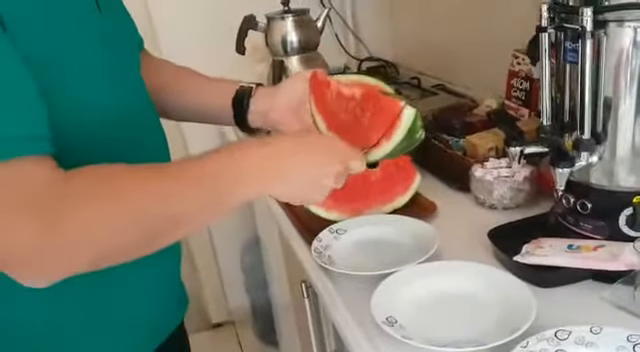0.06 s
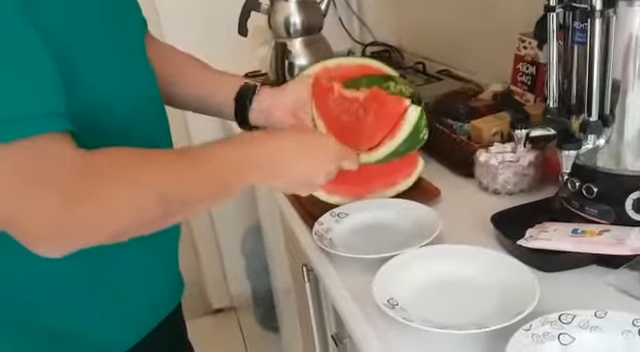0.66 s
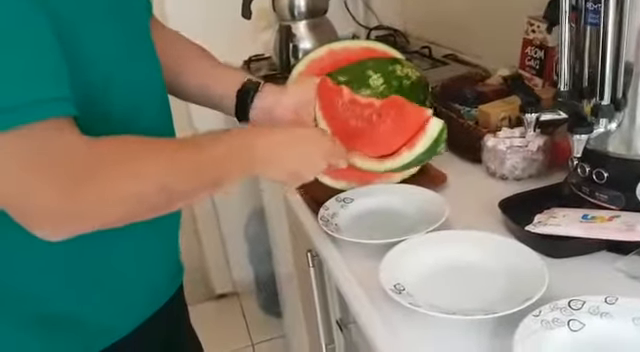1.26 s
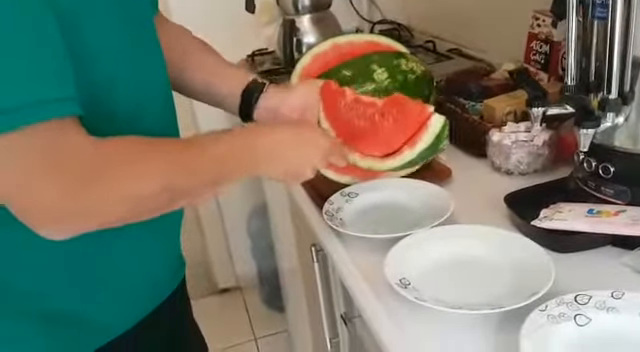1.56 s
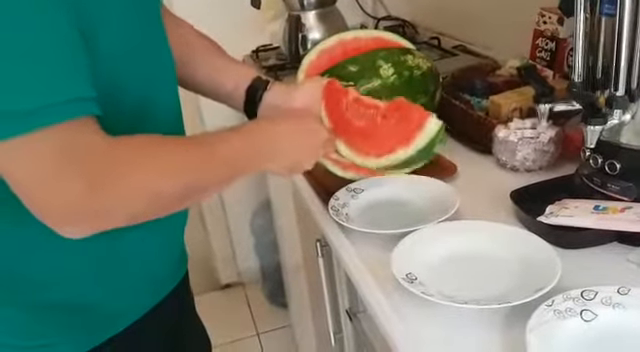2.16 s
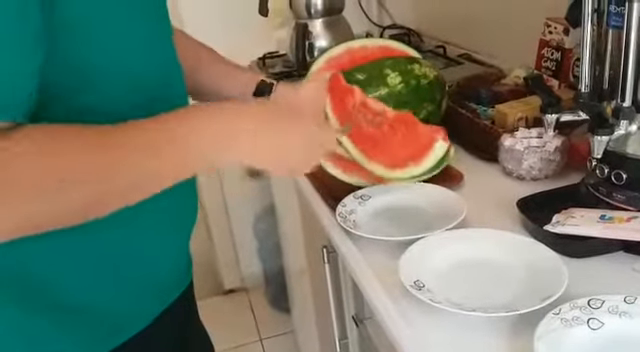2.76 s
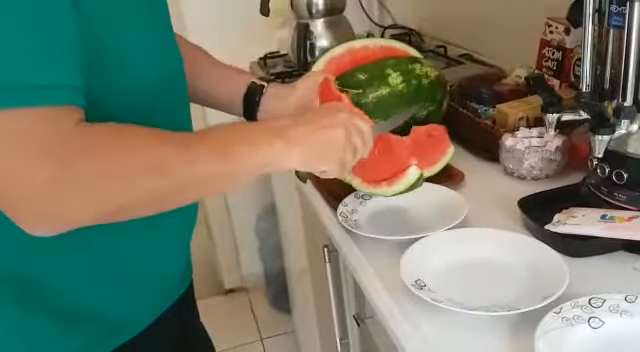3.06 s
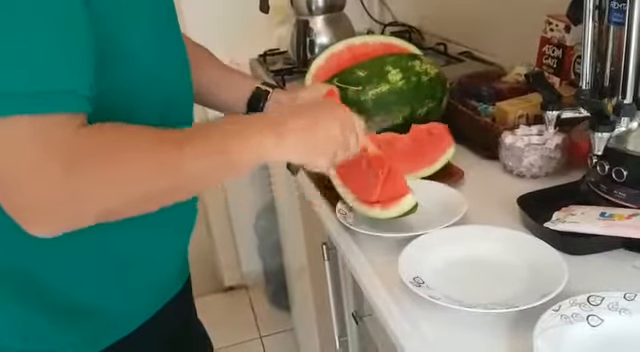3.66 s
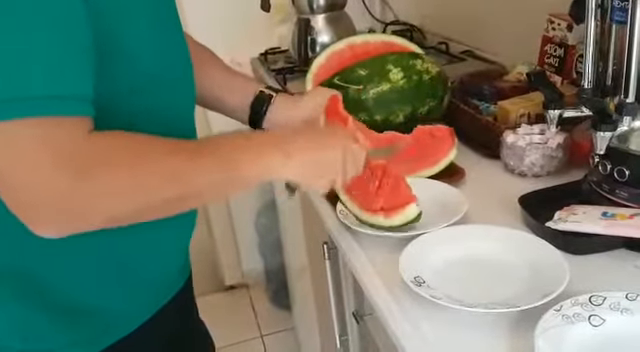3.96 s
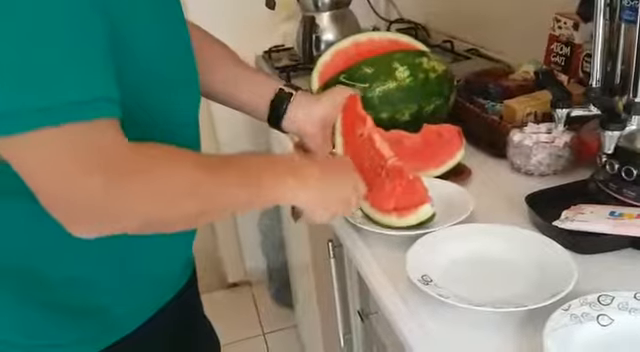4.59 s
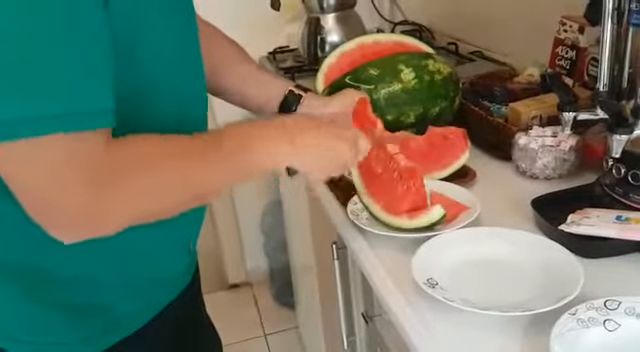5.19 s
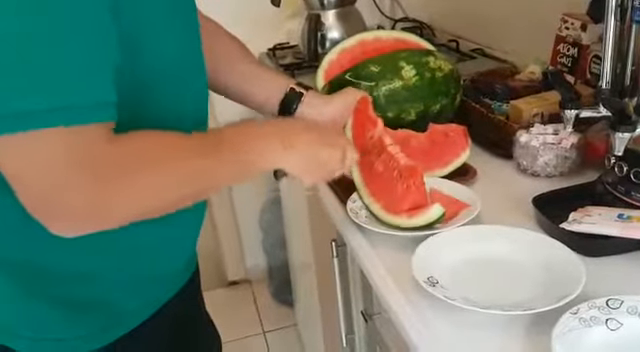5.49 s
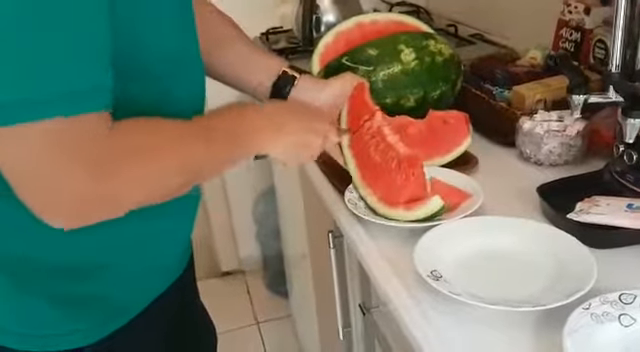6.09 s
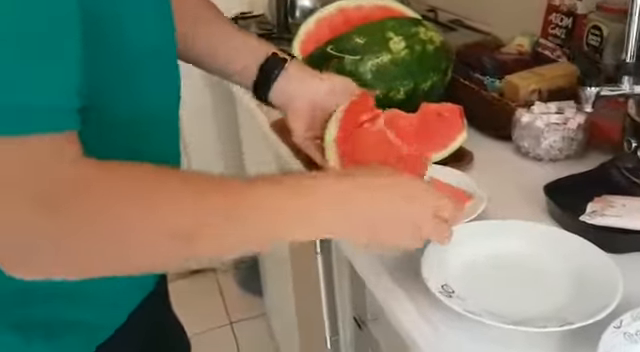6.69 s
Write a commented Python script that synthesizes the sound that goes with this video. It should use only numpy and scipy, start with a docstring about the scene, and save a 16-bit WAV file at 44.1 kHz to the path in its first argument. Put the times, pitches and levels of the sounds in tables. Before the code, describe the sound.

For the first second or so, a knife saws back and forth through a watermelon slice in soft, even, wet strokes. Separate juicy crunches follow until about 3.8 seconds, with tiny snaps of fibre and faint creaks of rind. Around 4 seconds a china plate clatters loudly on the counter as the steel blade clinks against it several times. Wet cuts continue until about 6 seconds, mixed with lighter plate knocks, dull bumps of the fruit, a short creak at 5 seconds and bright taps on the china near 5.5, 5.7 and 6.3 seconds. From 6.7 to 6.9 seconds the plate clatters sharply again, with ringing clinks and low thumps. Everything is heard from about a metre away in a small, hard-walled kitchen, over faint room air, an appliance hum and a low rumble.

```python
"""A small, hard-walled kitchen, about a metre from a knife sawing through a watermelon slice.
Short wet strokes come first, each a crowd of bursting cells, with snapping fibres and creaking rind.
Then the slice is carved over a china plate, which rocks and knocks on the counter; impacts of rind
and blade excite the damped modes of china and steel. Room air, an appliance hum and a dull rumble
lie underneath."""
import sys
import numpy as np
from scipy import signal
from scipy.fft import rfft, irfft
from scipy.io import wavfile
from scipy.ndimage import uniform_filter1d, minimum_filter1d

SR = 44100
rng = np.random.default_rng(int(sys.argv[2]) if len(sys.argv) > 2 else 0)


def materialize(psi):
    """Save the field psi as 16-bit PCM at rate SR to the path in sys.argv[1].

    A 1-D psi becomes a single channel; in a 2-D psi each row is a channel.
    """
    bounded = np.clip(np.atleast_2d(psi).T, -1, 1)
    quanta = np.round(bounded * 32767).astype(np.int16)
    wavfile.write(sys.argv[1], SR, quanta)


N = 306054
SIZE = 32768  # samples in one event
HZ, T = np.fft.rfftfreq(SIZE, 1 / SR), np.arange(SIZE) / SR
SCENE_T = np.arange(N) / SR


def amp(db):
    """Decibels to amplitude ratio."""
    return 10 ** (np.asarray(db) / 20)


def unit_rms(x):
    """Normalisation to an rms of one."""
    return x / np.sqrt(np.mean(x ** 2) + 1e-20)


def curve(points, hz):
    """Interpolation along a log-frequency axis."""
    f, value = np.transpose(points)
    return np.interp(np.log(hz + 1), np.log(f + 1), value)


def add(mix, start_s, sound):
    """Superposition: a stereo event joins the mix, its tail faded out."""
    sound = sound * np.clip((T[-1] - T) * 10 - .5, 0, 1)
    part = mix[:, max(round(start_s * SR), 0):]
    part[:, :SIZE] += sound[:, :part.shape[1]]


def causal(db):
    """Minimum phase: a filter that sounds only after it is struck."""
    log_gain = np.log(amp(np.maximum(db, db.max() - 100)))
    mirrored = np.r_[log_gain, log_gain[-2:0:-1]]
    return np.exp(np.conj(signal.hilbert(mirrored)))[:len(db)]


def resonance(hz, octaves, depth_db):
    """A band-pass response in dB, 6 down at `octaves` from its centre."""
    return np.maximum(-6 * (np.log2((HZ + 1) / hz) / octaves) ** 2, -depth_db)


def impact(spectrum, db, lasts_s=0.031):
    """An impulse response with the energy of level db held for lasts_s."""
    return amp(db) * unit_rms(irfft(spectrum)) * np.sqrt(lasts_s * SR / SIZE)


def ring(modes, paths, tilt_db=0, shift_hz=0, damping=1, scatter_hz=0):
    """Modal synthesis: damped resonances heard along the room's paths; damping divides each t60."""
    hz, db, t60 = np.transpose(modes)
    hz = hz + shift_hz + scatter_hz * rng.standard_normal(len(hz))
    shapes = 1 / (damping * np.log(1000) / t60[:, None] + 2j * np.pi * (HZ - hz[:, None]))
    shapes *= HZ * hz[:, None] / (HZ + hz[:, None]) ** 2  # a mode radiates little far from its pitch
    power = np.einsum("mf,f->m", abs(shapes) ** 2, (abs(paths) ** 2).mean(0))
    weights = amp(db + tilt_db * np.log2(hz / hz[0])) / np.sqrt(power) * rng.choice([-1, 1], len(hz))
    return np.einsum("m,mf->f", weights, shapes) * paths


# likeness of the two channels: frequency_hz, coherence
COHERENCE = [(60, 0.78), (350, 0.89), (750, 0.56), (1300, 0.039), (2000, 0.0084), (5000, 0.14), (16000, 0)]
# balance of the channels: frequency_hz, left_minus_right_db
BALANCE = [(60, -1.5), (350, -4), (1200, -3.5), (2200, -5), (5000, -7), (16000, 1)]
def stereo(spectra, hz):
    """Partial coherence: two spectra become left and right, alike in the bass, apart in the treble."""
    coherence = curve(COHERENCE, hz)
    left = coherence * spectra[1] + np.sqrt(1 - coherence ** 2) * spectra[0]
    return np.array([left * amp(curve(BALANCE, hz)), spectra[1]])


# reverberation time of the kitchen: frequency_hz, t60_s
REVERB = [(100, 0.99), (400, 0.42), (1200, 0.4), (2500, 0.5), (6000, 0.43), (16000, 0.37)]
def kitchen(early_db=3, early_s=0.011, direct=4):
    """Room transfer function: direct sound, a swell of early reflections and a diffuse tail."""
    taps = rng.choice([-1, 1], (2, SIZE)) * (rng.random((2, SIZE)) < .2)
    taps = unit_rms(taps) * (1 + amp(early_db) * T / early_s * np.exp(1 - T / early_s))
    taps[:, 0] += 2 * direct
    hz, t, bands = signal.stft(taps, SR, nperseg=256)
    decay = amp(-60 * t / curve(REVERB, hz)[:, None])
    response = signal.istft(bands * decay, SR, nperseg=256)[1]
    return stereo(rfft(response[:, :SIZE]), HZ)


def noise(colour, patchy_db=0):
    """Spectrally shaped Gaussian noise whose bands drift in level by patchy_db."""
    hz = np.fft.rfftfreq(2048, 1 / SR)
    real, imag = rng.standard_normal((2, 2, N // 512 + 5, len(hz)))
    drift = uniform_filter1d(rng.standard_normal(real.shape[1:]), size=12, axis=0)
    patches = unit_rms(uniform_filter1d(drift, size=3, axis=1))
    bands = stereo(real + 1j * imag, hz) * amp(curve(colour, hz) + patchy_db * patches)
    return unit_rms(signal.istft(bands.transpose(0, 2, 1), nperseg=2048, noverlap=1536)[1][:, :N])


def tone(hz, waver_cycles):
    """Random phase modulation makes a sine of rms one waver."""
    knots = np.linspace(0, SCENE_T[-1], num=40)
    drift = np.interp(SCENE_T, knots, waver_cycles * rng.standard_normal(len(knots)))
    return np.sqrt(2) * np.sin(2 * np.pi * (hz * SCENE_T + drift))


# spectrum of the room air: frequency_hz, relative_db
AIR = [(25, -7), (60, -34), (150, -8), (185, -15), (250, -4), (330, -8), (450, -4.5), (650, -7),
       (1000, -14.5), (1800, -11), (3000, -20.5), (5700, -26), (9500, -33), (15500, -28)]
def room_air(level_db=-63):
    """Stationary broadband noise sets the room's noise floor."""
    return amp(level_db) * noise(AIR)


# spectrum of the rumble: frequency_hz, relative_db
RUMBLE = [(25, -12), (55, -4.5), (100, -4.5), (170, -0.5), (230, 2.5), (330, 0.5), (450, -15),
          (1200, -15.5), (4000, -48)]
# spells of louder rumble: start_s, end_s, gain_db
RUMBLE_SPELLS = [(0, 1.0, -63), (4.109, 6.94, -59)]
def rumble(rest_db=-77.5, fade_s=.2, drone_hz=98, drone_db=-9):
    """Slow amplitude modulation: low noise and a drone come and go."""
    sound = noise(RUMBLE, patchy_db=4.5) + amp(drone_db) * tone(drone_hz, waver_cycles=0.39)
    swell = sum(amp(db) * np.clip(1 + np.minimum(SCENE_T - start, end - SCENE_T) / fade_s, 0, 1)
                for start, end, db in RUMBLE_SPELLS)
    return (amp(rest_db) + swell) * sound


# appliance tones: pitch_hz, level_db
HUM = [(99, -80), (291, -90), (328, -73.5), (3661, -90), (4721, -93), (6600, -92)]
def appliance_hum():
    """A line spectrum: appliances hum and whine at a few wavering pitches."""
    return sum(amp(db) * tone(hz, waver_cycles=0.47) for hz, db in HUM)


# the fruit bumps the counter: start_s, level_db
THUMPS = [(4.285, -44), (5.382, -42), (5.722, -48.5), (6.308, -51), (6.736, -46.5), (6.856, -38.5),
          (6.915, -39)]
def fruit_thumps(boom_hz=106.6):
    """Impact of the heavy fruit excites a broad, low resonance of the counter."""
    out = np.zeros((2, N))
    boom = causal(resonance(boom_hz, octaves=0.93, depth_db=76))
    for start, db in THUMPS:
        add(out, start, impact(boom * kitchen(), db))
    return out


# free modes of the china plate: pitch_hz, relative_db, t60_s
PLATE_MODES = [(2193, -0.5, 0.34), (2320, -12, 0.131), (3450, -1, 0.078), (3575, -8, 0.064),
               (3790, -18, 0.062), (4790, -6.5, 0.162), (4865, -14, .12), (6080, -11, 0.089),
               (6080, -16, 0.078), (7520, -12.5, 0.15), (7660, -16, 0.039), (8460, -23, 0.097),
               (9150, -28, .1), (9400, -31.5, 0.075), (10700, -27.5, .12), (11270, -33, .12),
               (12685, -31, .17), (13740, -28.5, 0.071), (14800, -27, .12)]
def china(start, db, tilt_db, pressed_db=-6, regrip_s=6.15, regrip_shift_hz=76):
    """Free vibration of the plate, plus a damped, detuned ring while it is still pressed."""
    paths = kitchen(early_db=4, early_s=.012, direct=4.7)
    shift_hz = regrip_shift_hz * (start > regrip_s)  # shifting the slice raises the modes
    free = ring(PLATE_MODES, paths, tilt_db, shift_hz)
    pressed = ring(PLATE_MODES, paths, tilt_db, shift_hz, damping=5.1, scatter_hz=65)
    return impact(free, db) + impact(pressed, db + pressed_db)


# sharp taps on the china: start_s, level_db, tilt_db_per_octave
CHINKS = [(5.467, -34.5, 2.5), (5.745, -37, 5), (6.305, -39.5, 1), (6.447, -50.5, -3), (6.725, -37.5, -2),
          (6.749, -35, -1.5), (6.8905, -31, -3)]
def plate_chinks():
    """Impulsive excitation: a brief contact reaches the plate's high modes."""
    out = np.zeros((2, N))
    for start, db, tilt_db in CHINKS:
        add(out, start, china(start, db, tilt_db))
    return out


# modes of the steel blade: pitch_hz, relative_db, t60_s
BLADE_MODES = [(3924, 6.5, 0.037), (4800, -4, 0.041), (5884, -4.5, 0.11), (6037, 2.5, 0.051),
               (6080, 5.5, 0.24), (7620, -11, 0.064), (7720, -2.5, 0.25), (8300, -12, 0.32),
               (9740, -30, 0.14), (10400, -13.5, 0.21), (11000, -27.5, .15), (10750, -33, 0.091),
               (12636, -10, 0.175), (12760, -32.5, 0.13), (14700, -24, 0.0797), (15220, -14.5, 0.077)]
# the blade meets the rim: start_s, level_db
CLINKS = [(3.918, -35), (3.947, -36.5), (3.975, -38.5), (4.0169, -25.5), (4.68, -49), (5.467, -54),
          (6.747, -41.5), (6.893, -36.5)]
def blade_clinks():
    """Struck steel rings at its natural frequencies."""
    out = np.zeros((2, N))
    for start, db in CLINKS:
        add(out, start, impact(ring(BLADE_MODES, kitchen(), tilt_db=1.5), db))
    return out


def rocking(start, build_s, peak_db, gap_s=.02, jitter_s=.002, rise_db_per_s=257.5, fall_db_per_s=337):
    """Contacts (time_s, level_db) of a rocking plate grow, then decay exponentially."""
    t = gap_s * np.arange(3 + int(build_s / gap_s + .5))
    below_db = np.maximum(rise_db_per_s * (build_s - t), fall_db_per_s * (t - build_s))
    jitter = jitter_s * rng.standard_normal(len(t)) * (t > 0)
    return zip(start + t + jitter, peak_db - below_db)


# spectrum of the plate's clack: frequency_hz, relative_db
CLACK = [(50, -35), (120, -23), (230, -18), (400, -9), (750, -3), (1200, 2.5), (1700, 1), (2300, -6),
         (3000, -16), (4200, -28.5), (7000, -42), (9500, -61.5), (16000, -64.5)]
# low modes of the loaded plate on the counter: pitch_hz, relative_db, t60_before_damping_s
LOADED_MODES = [(396, 1, 0.64), (562.8, -1.5, 0.33), (688, -3.5, 0.5), (944, -24.5, 0.36),
                (1040, 0.5, 0.29), (1076, -1, 0.56), (1092, 7, 0.18), (1250, 11, 0.141), (1296, 7.5, 0.41),
                (1597, -7, 0.27), (1940, -16, 0.359), (2020, -23.5, 0.57), (2530, -19, 0.12),
                (2630, 6, 0.13)]
# jolts of the plate: start_s, build_s, relative_db, hardness_db_per_octave, china_ring_db
KNOCKS = [(3.853, 0, -24.5, -11.5, -31.5), (3.916, 0.0025, -13, -2, -17), (3.965, 0.0075, -15, 2, -16),
          (4.019, 0.0067, -9.5, 8, -24), (4.245, 0.013, -21.5, -5, -33.5), (4.409, 0.015, -36, -18.5, -50),
          (4.677, 0.0012, -20, -1, -29), (4.916, .045, -24, -11, -48), (5.37, .022, -46, -24, -68),
          (5.467, 0.002, -33.5, -4, -33.5), (5.727, 0.0093, -38.5, -9.5, -59),
          (6.048, 0.00075, -36.5, -21, -60), (6.09, 0.0013, -41, -9, -61.5),
          (6.299, 0.014, -33, -13.5, -45.5), (6.434, 0, -40, -17, -56), (6.467, 0, -40, -13, -54),
          (6.725, .016, -21.5, 4, -41), (6.857, 0.0065, -34, -4, -48), (6.89, 0.00077, -15.5, 9, -24)]
def plate_knocks(clack_db=-0.5, modes_db=-7, hollow_db=-15, hollow_hz=515, knee_hz=1360, top_hz=5000):
    """Contact hardness sets bandwidth: the plate clacks on the counter, and soft blows lose treble."""
    out = np.zeros((2, N))
    # about one dB per octave from knee to top
    unit_tilt = causal(np.log2((1 + (HZ / knee_hz) ** 2) / (1 + (HZ / top_hz) ** 2)) / 2)
    body = causal(curve(CLACK, HZ))
    midrange = causal(resonance(950, octaves=1.57, depth_db=45))
    hollow = causal(resonance(hollow_hz, octaves=0.54, depth_db=73))
    for start, build_s, peak_db, hardness, ring_db in KNOCKS:
        for contact_s, db in rocking(start, build_s, peak_db):
            delays_s = rng.exponential(.012, size=3)  # each contact chatters briefly
            chatter = 1 + 0.48 * np.exp(-2j * np.pi * delays_s[:, None] * HZ).sum(0)
            force = unit_tilt ** hardness * chatter
            paths = kitchen(early_s=0.0064, direct=3.9)
            clack = impact(force * body * paths, db + clack_db)
            modes = impact(force * midrange * ring(LOADED_MODES, paths, damping=1.98), db + modes_db)
            add(out, contact_s, clack + modes)
        plate_ring = china(start, ring_db, tilt_db=-23)  # mostly the lowest mode
        fruit_note = impact(hollow * kitchen(), peak_db + hollow_db)
        add(out, start + build_s, plate_ring + fruit_note)
    return out


# the rind is prised open: start_s, length_s, level_db, pitch_hz
CREAKS = [(1.293, 0.16, -58, 596), (1.543, 0.074, -61, 457), (1.605, 0.055, -59.5, 600),
          (2.212, .18, -62.5, 654), (3.311, .08, -49, 2320), (5.009, .095, -41.5, 406)]
def rind_creaks():
    """Stick-slip friction in the rind, as a swell of narrow-band noise."""
    out = np.zeros((2, N))
    for start, length, db, hz in CREAKS:
        slips = stereo(rfft(rng.standard_normal((2, SIZE))), HZ)
        creak = unit_rms(irfft(slips * amp(resonance(hz, octaves=0.054, depth_db=60))))
        swell = np.sin(np.pi * np.minimum(T / length, 1))
        add(out, start, amp(db) * creak * swell)
    return out


# fibres snap and juice spits, and at 3.464 s the blade gives one short dry stroke: start_s, level_db,
# centre_hz, half_width_octaves
SNAPS = [(1.192, -62, 12900, 5.4), (1.506, -59.5, 9500, .15), (2.1, -64.5, 3030, 0.91),
         (2.585, -66.5, 3500, .86), (3.211, -67, 4400, .49), (3.464, -56.5, 1930, 1.1),
         (3.524, -58, 15160, .2), (6.621, -68, 4460, 0.43)]
def fibre_snaps():
    """A sudden release of stress radiates a click with one spectral peak."""
    out = np.zeros((2, N))
    for start, db, hz, octaves in SNAPS:
        click = causal(resonance(hz, octaves, depth_db=21))
        add(out, start, impact(click * kitchen(early_s=.005), db))
    return out


# a long push and a shorter pull: delay_s, length_s, relative_db, tilt_db_per_octave
SAW_CYCLE = [(0, 0.13, -55.5, 0.3), (0.157, 0.11, -55.5, 0.4)]
def sawing(first_s=0.0092, period_s=.286, cycles=4):
    """Periodic motion: the opening strokes go to and fro at an even pace."""
    starts = first_s + period_s * np.arange(cycles)
    return [(start + delay, *stroke) for start in starts for delay, *stroke in SAW_CYCLE]


# spectrum of the wet flesh: frequency_hz, relative_db
FLESH = [(150, -16.5), (350, -5.5), (650, -1.5), (950, -1.5), (1400, 0), (2200, 0), (2620, 0.5),
         (3100, -3.5), (4000, -6.5), (7500, -12), (9300, -26), (12000, -21), (15500, -21)]
# single strokes of the blade: start_s, length_s, relative_db, tilt_db_per_octave
STROKES = [(1.19, 0.13, -53.5, -0.5), (1.326, 0.074, -50, 2), (1.492, 0.1, -52.5, 1),
           (1.596, 0.14, -49.5, -0.1), (1.778, 0.077, -45.5, 0.1), (2.159, 0.087, -47, 0.1),
           (2.241, 0.18, -61, -2), (3.28, 0.089, -46.5, 2), (3.516, 0.035, -54, -1),
           (3.769, 0.11, -47.5, 2.5), (4.158, 0.15, -43, -1.5), (4.578, 0.096, -44, .1),
           (4.933, 0.085, -46.5, 0), (5.069, 0.14, -62.5, 5), (5.315, 0.059, -43, -1),
           (5.664, 0.063, -44, 0), (5.975, 0.076, -43, -.5)]
def knife_strokes(cells_per_s=3000, spread_db=3, gain_db=2, fastest_share=0.41):
    """Shot noise: each stroke bursts a crowd of juicy cells, louder as the blade speeds up."""
    out = np.zeros((2, N))
    for start, length, db, tilt_db in sawing() + STROKES:
        speed = np.interp(T / length, [0, fastest_share, 1], [0, 1, 0])
        bursts = (rng.random(SIZE) < cells_per_s / SR) * rng.choice([-1, 1], SIZE)
        strengths = amp(spread_db * np.minimum(rng.exponential(1, SIZE), 4))
        crackle = unit_rms(bursts * strengths) * speed ** 0.55
        flesh = causal(curve(FLESH, HZ) + tilt_db * np.log2((HZ + 100) / 2500))
        colour = flesh * kitchen(early_db=6.5, early_s=0.0019)
        colour /= np.sqrt(np.mean(abs(colour) ** 2))
        add(out, start, amp(db + gain_db) * irfft(rfft(crackle) * colour))
    return out


# where the work is heard from: time_s, extra_left_minus_right_db
PAN = [(0, -1.5), (3.3, -1), (3.85, 1), (4.9, -0.5), (5.6, -1)]
def scene():
    """Level difference sways knife, fruit and plate a little from side to side over the background."""
    cutting = knife_strokes() + fibre_snaps() + rind_creaks()
    impacts = plate_knocks() + fruit_thumps() + plate_chinks() + blade_clinks()
    background = appliance_hum() + rumble() + room_air()
    pan_db = np.interp(SCENE_T, *np.transpose(PAN))
    return (cutting + impacts) * amp([pan_db / 2, -pan_db / 2]) + background


def record(dry, ceiling_db=-2.5, cutoff_hz=15900):
    """Peak limiting by a smoothed gain, then a low-pass band limit."""
    safe_gain = np.minimum(amp(ceiling_db) / (abs(dry).max(0) + 1e-9), 1)
    limited = dry * uniform_filter1d(minimum_filter1d(safe_gain, size=301), size=301)
    lowpass = signal.firwin(511, cutoff_hz, window=("kaiser", 9), fs=SR)
    return signal.oaconvolve(limited, lowpass[None], "same")


dry = scene()
out = record(dry)
materialize(out)
```